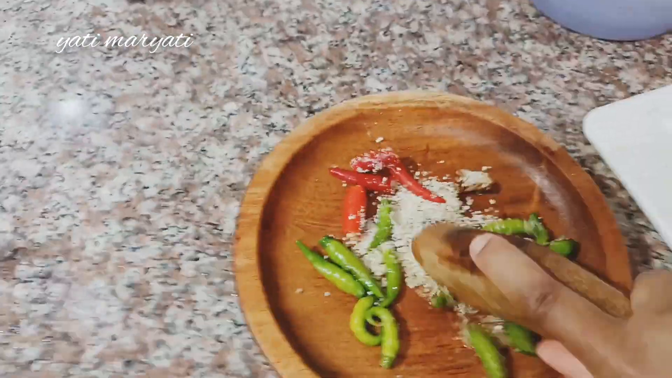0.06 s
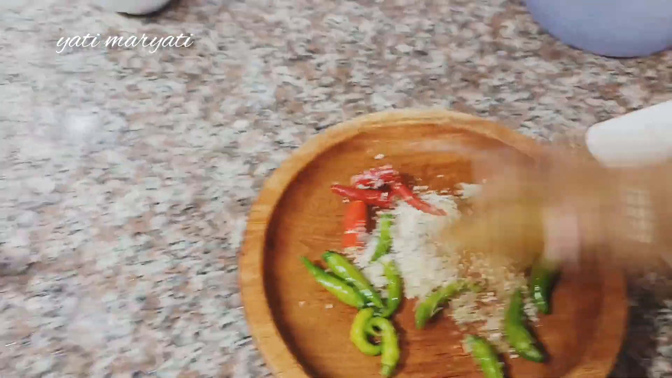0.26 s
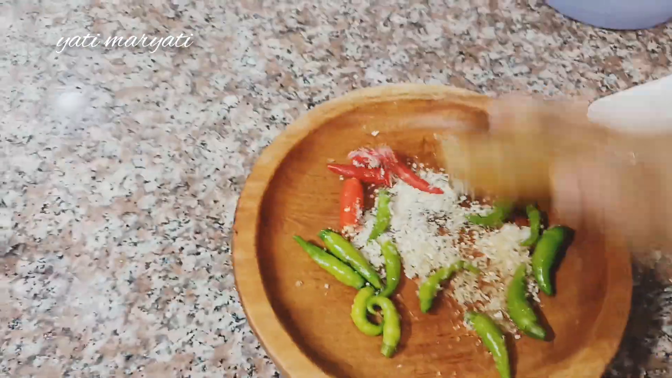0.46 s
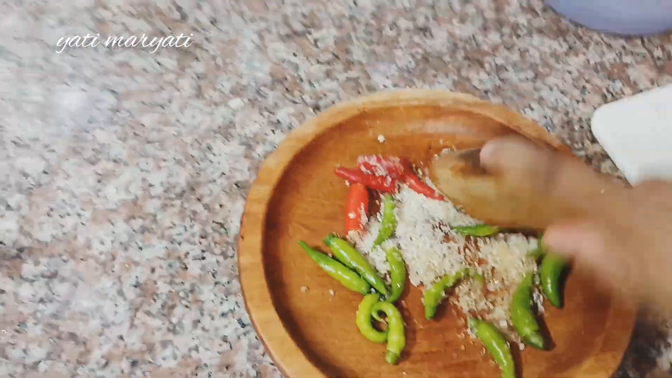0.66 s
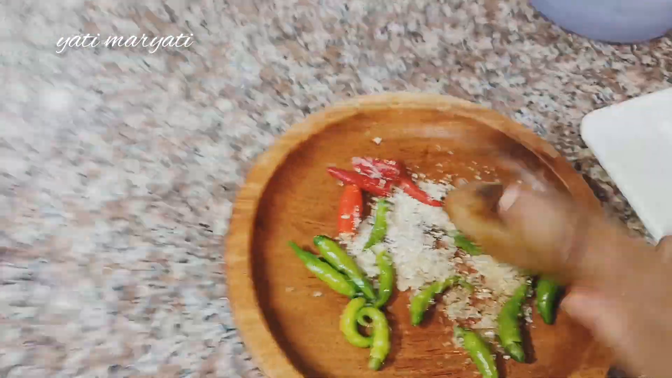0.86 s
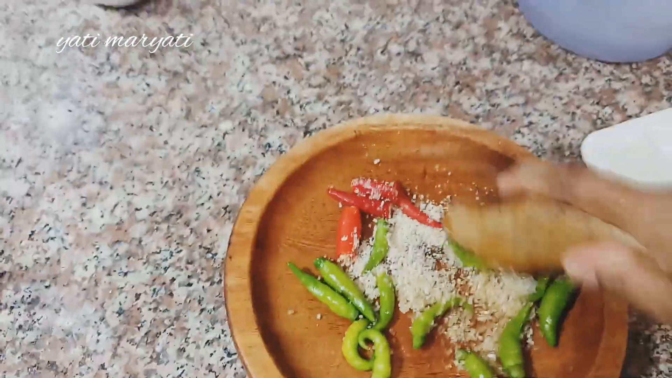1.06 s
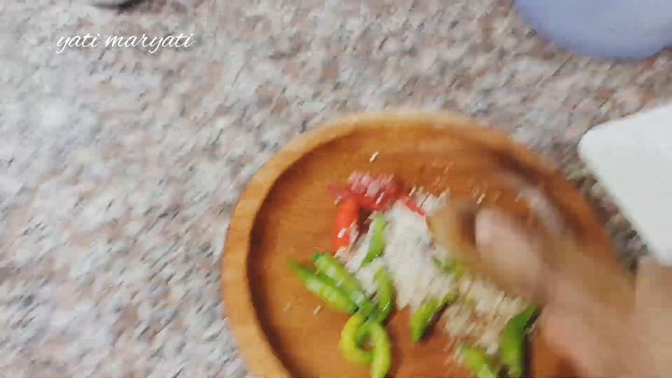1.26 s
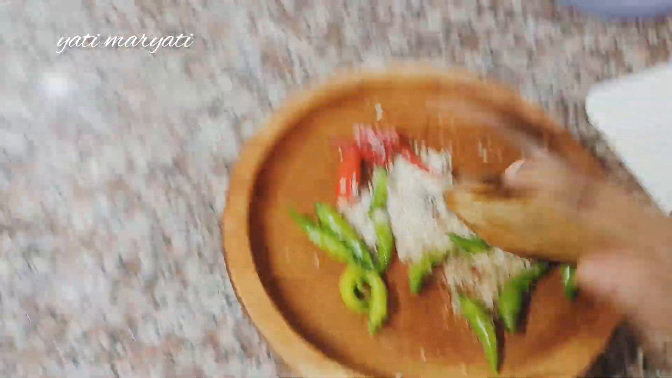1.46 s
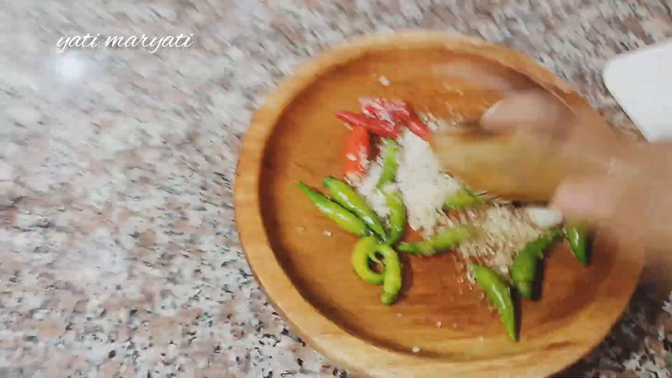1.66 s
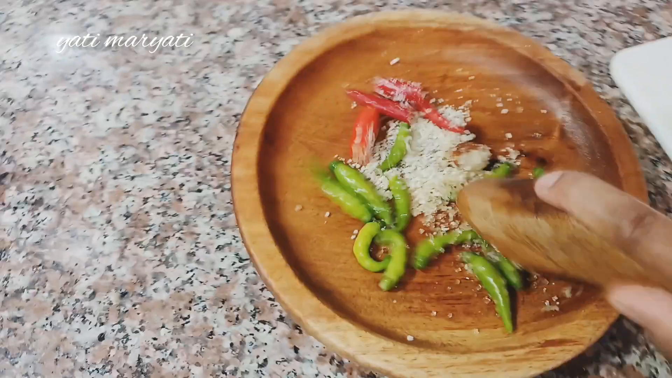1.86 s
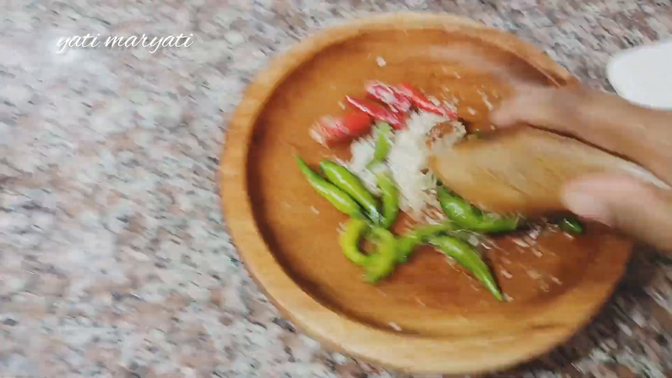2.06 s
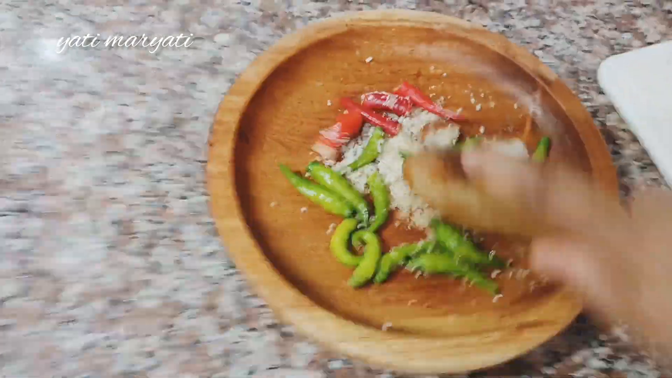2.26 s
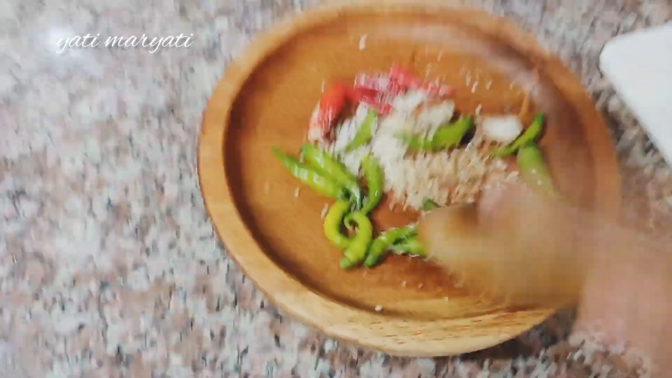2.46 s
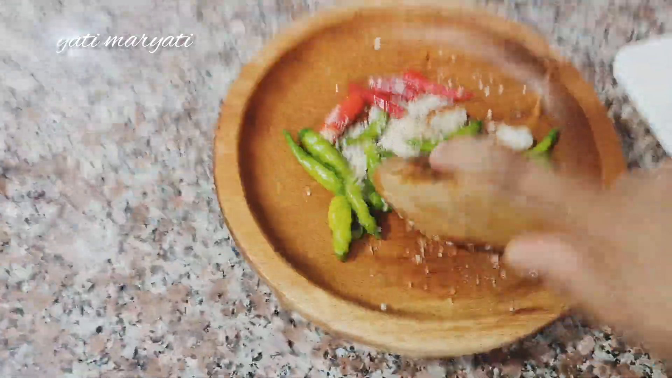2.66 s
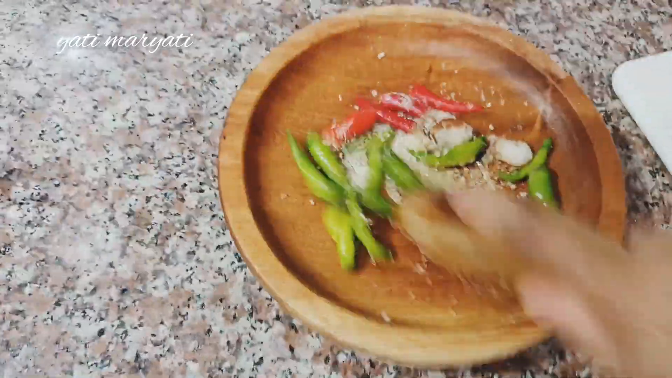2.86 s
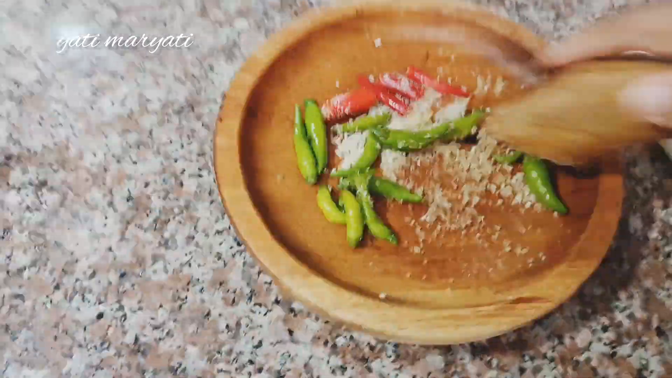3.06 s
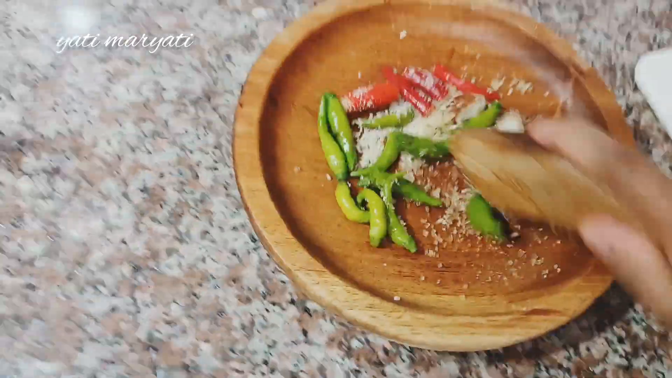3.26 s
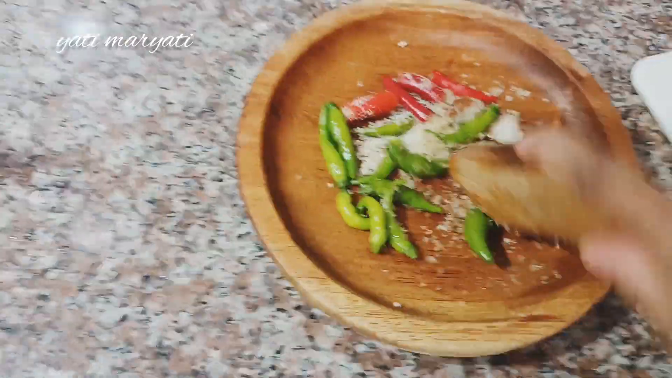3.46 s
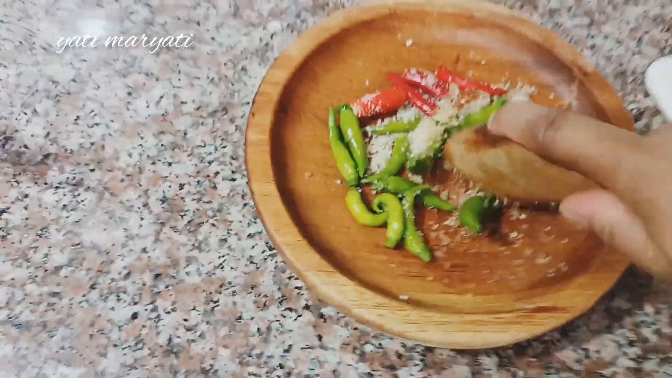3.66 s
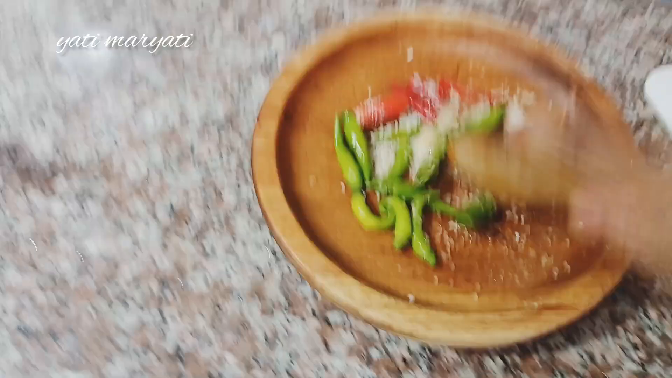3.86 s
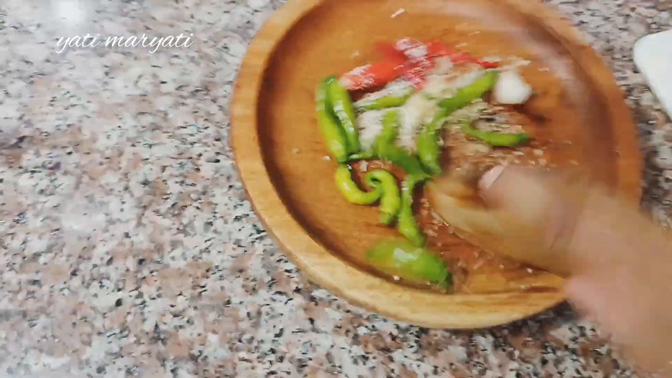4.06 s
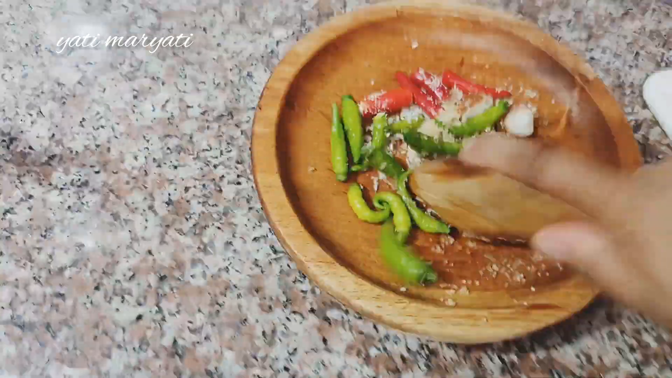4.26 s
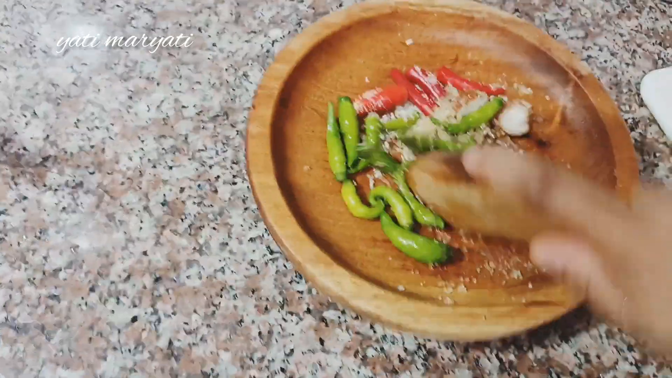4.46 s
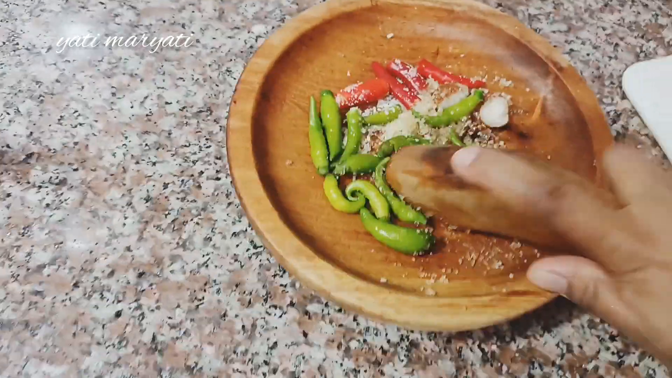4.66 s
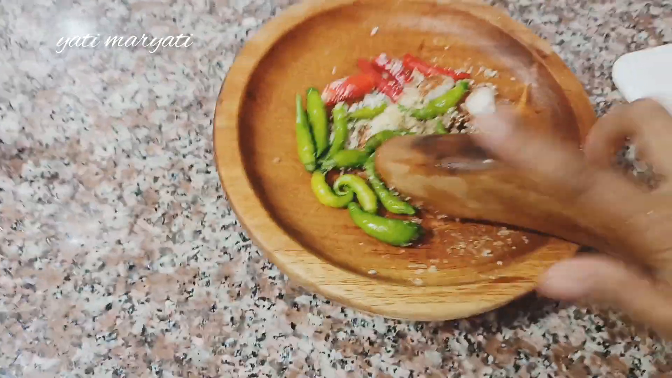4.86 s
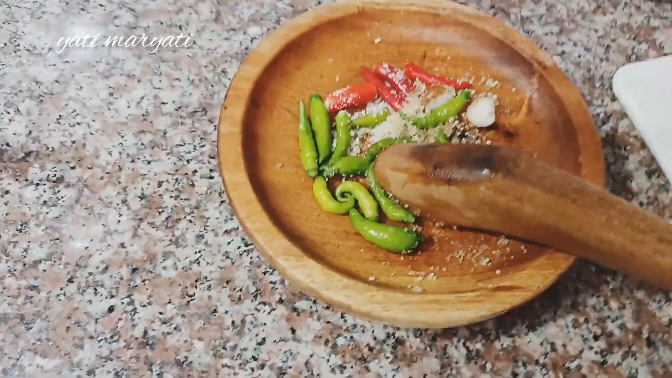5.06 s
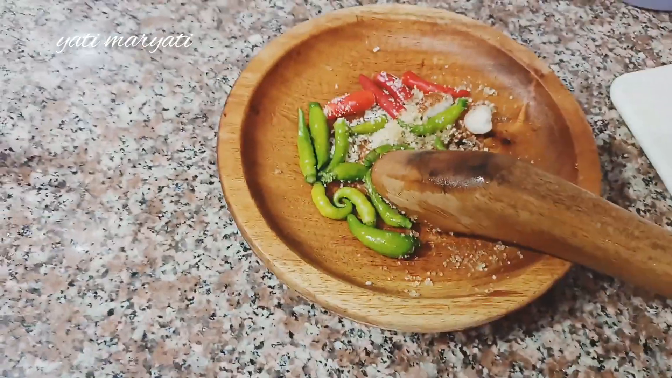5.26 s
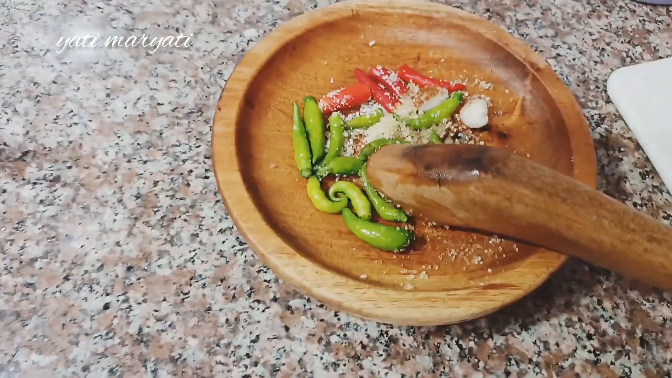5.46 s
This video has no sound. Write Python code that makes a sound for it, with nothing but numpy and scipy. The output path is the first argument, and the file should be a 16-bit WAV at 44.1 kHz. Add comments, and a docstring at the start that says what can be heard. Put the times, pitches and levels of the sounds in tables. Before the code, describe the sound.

Close stereo sound of a wooden pestle crushing grains, garlic and chillies on a wooden plate, in a small kitchen with short, bright echoes. From 0 to 0.3 s a press crackles with several snaps. After a brief gap, a light wood knock and dull thump at about 0.5 s lead into softer gritty sweeps, brighter near 1.0 s, with sharp cracks around 1.3 s and a strong crunch at 1.6 s. From 1.9 to 2.4 s strokes come faster, with low rumbling drags. Around 2.6 s wood knocks and a hollow growl join in, then a dense run of cracks to 3.0 s. Heavy, ringing presses follow from 3.2 s, with loud snaps and a thump near 3.6 s and another knock at 4.2 s. Crunching thins out by 4.75 s. A faint, soft tap at 5.0 s leaves only quiet low hum and airy room noise until about 5.5 s.

```python
"""Crunching and cracking of grains, garlic and chillies, crushed by a wooden pestle on a wooden plate.
Each stroke is a shower of tiny random clicks: sweeps mostly crunch, while presses make the plate ring.
Noise bursts make the loud cracks; heavy drags shake the plate into a low rumble and a hollow growl.
Fading sine waves make the knocks of wood on wood and the dull thumps of the plate on a stone counter.
Behind it lie a faint hum and soft air, both filtered noise; random echoes make the small kitchen."""
import sys
import numpy as np
from scipy import signal
from scipy.fft import rfft, irfft
from scipy.io import wavfile
from scipy.ndimage import uniform_filter1d

SR = 44100
rng = np.random.default_rng(int(sys.argv[2]) if len(sys.argv) > 2 else 0)


def store_pcm(level_fs):
    """Save levels as 16-bit WAV."""
    pcm = np.round(np.clip(level_fs, -1, 1) * 32767).astype(np.int16)
    wavfile.write(sys.argv[1], SR, np.atleast_2d(pcm).T)


N = 242632
TIME = np.arange(N) / SR

# Colour of the room air. Each row: frequency in Hz, relative level in dB.
AIR_COLOUR = [(20, -9.5), (60, 0.5), (125, -15), (260, -10), (350, -6), (480, -12), (750, -8),
              (1400, -12.5), (2800, -16), (5600, -23.5), (10000, -30), (16000, -37)]
AIR_DB = -47.5
# A faint appliance hum. Each row: frequency in Hz, level in dB.
HUM_TONES = [(123, -55.5), (180, -58)]
# How long the kitchen echoes. Each row: frequency in Hz, time to fade by 60 dB in seconds.
KITCHEN_FADE = [(150, 0.044), (2000, 0.31), (6000, 0.34), (16000, 0.3)]
# The resonance of each microphone's opening, left then right.
# Each row: frequency in Hz, width in Hz, lift in dB.
MICROPHONE_PORTS = [(10060, 1240, 14.5), (10760, 1990, 17)]
LEFT_LAG_MS = 0.93
EDGE_HZ = 15850  # almost nothing sounds above this frequency

# The plate rocks on the counter. Each row: start in seconds, relative level in dB, starting pitch in Hz.
PLATE_THUMPS = [(0.46, -43, 106.4), (0.522, -33, 85.5), (0.716, -31.5, 65.5), (0.833, -36, 180),
                (1.151, -40, 172), (1.888, -29, 93), (2.568, -31.5, 98), (3.627, -23.5, 171),
                (4.123, -30.5, 102)]
# The pestle meets bare wood. Each row: start in seconds, relative level in dB, contact time in
# milliseconds, length of the onset in seconds, pitch of the modes as a ratio.
WOOD_KNOCKS = [(0.4597, -25.5, 0.84, 0.00043, 0.97), (0.516, -35, 0.8, 0.003, 1.06),
               (2.588, -30, 0.4, 0.0039, 0.99), (2.606, -28, .35, 0.002, 0.96),
               (4.172, -26, 0.98, 0.0022, 0.77), (5.004, -32, 0.46, 0.0045, 1.06)]
# The pestle and plate ringing free after a knock.
# Each row: frequency in Hz, relative level in dB, time to fade by 60 dB in seconds.
WOOD_MODES = [(610, 6, 0.023), (739, 11, 0.041), (809, 1.5, 0.11), (1035, -8, 0.057), (1847, 4.5, 0.04),
              (2440, 6.5, 0.015)]
# The arm's weight makes the pestle judder across the plate.
# Each row: start in seconds, length in seconds, relative rumble level in dB, relative growl level in dB.
HEAVY_DRAGS = [(1.894, 0.11, -40, -45.5), (2.202, 0.13, -43.5, -48), (2.588, 0.078, -44, -33),
               (2.826, 0.14, -43, -35.5), (3.222, 0.14, -45, -49), (4.138, 0.11, -40, -38)]
# The plate's deep rumble on the counter and its hollow growl: frequency in Hz, width in Hz.
RUMBLE, GROWL = (127, 200), (574, 160)

# The pestle skims through loose grains, a bright crunch.
# Each row: start in seconds, length in seconds, relative level in dB.
GRAIN_SWEEPS = [(0.484, 0.078, -39), (0.565, 0.16, -32), (0.805, 0.091, -33), (0.918, 0.087, -30),
                (0.997, 0.044, -21), (1.125, 0.1, -33), (1.231, 0.16, -28), (1.434, 0.1, -35),
                (1.551, 0.15, -21), (1.877, 0.049, -25), (1.928, 0.046, -23), (1.965, 0.092, -20.5),
                (2.127, 0.089, -23), (2.419, 0.022, -27.5), (2.534, 0.044, -29), (2.6, 0.14, -23),
                (2.756, 0.064, -27), (3.308, 0.044, -14.5), (3.377, 0.062, -34.5), (3.471, 0.18, -31.5),
                (3.974, 0.046, -32.5), (4.126, 0.084, -21.5)]
# The pestle bears down and the plate rings. Each row: start in seconds, length in seconds,
# relative force in dB, extra force on the low modes in dB.
PLATE_PRESSES = [(0, 0.02, -26, -5), (0.022, 0.28, -35.5, -2.5), (0.117, 0.091, -23.5, 1.5),
                 (0.228, 0.045, -35, -12), (0.699, 0.024, -30, -10), (1.605, 0.081, -28.5, 3.5),
                 (1.978, 0.095, -30.5, 3.5), (2.22, 0.11, -36.5, 7), (2.28, 0.084, -22.5, 1.5),
                 (2.351, 0.032, -29.5, -10), (2.569, 0.051, -33, 10), (2.843, 0.064, -31.5, 12),
                 (2.916, 0.059, -20.5, -0.5), (3.179, 0.063, -35.5, 8), (3.214, 0.093, -24, 7.5),
                 (3.313, 0.037, -26, 9.5), (3.623, 0.076, -24.5, 0.5), (3.803, 0.082, -24.5, -1.5),
                 (3.873, 0.094, -29.5, -2), (4.085, 0.035, -34.5, -8), (4.136, 0.068, -32.5, 10.5),
                 (4.211, 0.11, -27, -1), (4.35, 0.075, -22, -14), (4.43, 0.15, -28.5, 0),
                 (4.662, 0.045, -40, 6.5)]
# Share of a sweep that reaches the plate's high and low modes, and the crunch that goes with a press.
SWEEP_HIGH_DB, SWEEP_LOW_DB, PRESS_CRUNCH_DB = -12, -11.5, 0.5
# Every stroke takes hold, swells to the middle of its path while the hand slackens, and lets go.
ATTACK_S, SWELL_DB, SAG_DB_PER_S, RELEASE_S = 0.0074, 3.5, 7, 0.026

# A large grain bursts. Each row: start in seconds, relative level in dB.
GRAIN_CRACKS = [(0.136, -15), (0.147, -11.5), (0.185, -13.5), (0.2527, -16), (.299, -14.5), (.562, -25.5),
                (.596, -30), (1.2602, -14.5), (1.281, -18.5), (1.3103, -10.5), (1.359, -18.5), (1.596, -18),
                (1.67, -25), (1.8833, -13.5), (1.9293, -14), (1.974, -15.5), (2.005, -17), (2.134, -13.5),
                (2.164, -17.5), (2.204, -21), (2.2298, -11.5), (2.38, -19), (2.5385, -18.5), (2.6085, -9),
                (2.6586, -18), (2.763, -18), (2.797, -16), (2.823, -11.5), (2.8542, -10.5), (2.860, -13.5),
                (2.8844, -14), (2.923, -11), (2.9339, -17.5), (2.96, -13.5), (2.9861, -12.5), (3.195, -22),
                (3.264, -16), (3.317, -9), (3.36, -18.5), (3.4822, -18), (3.605, -19), (3.6262, -7),
                (3.6336, -7.5), (3.6938, -8.5), (3.8192, -8), (3.832, -15), (3.883, -11.5), (4.1139, -12.5),
                (4.132, -14), (4.1717, -8), (4.2147, -13.5), (4.235, -16), (4.3562, -12.5), (4.451, -10.5),
                (4.508, -14.5), (4.5163, -9), (4.56, -11), (4.729, -12.5)]
# A crack's push on the plate when a press pins the grain or has just done so, and when it lies loose.
PINNED_DB, LOOSE_DB = 1.5, -6.5
PINNED_FOR_S = 0.05  # a grain still counts as pinned this long after a press

# Colour of a breaking grain. Each row: frequency in Hz, relative level in dB.
GRAIN_COLOUR = [(100, -43), (1000, 1.5), (1400, -13.5), (2400, -4.5), (3500, 4), (5500, 7), (8000, 2.5),
                (10000, 1.5), (12500, -4.5), (16000, -5)]
# The plate bending as a whole under the pestle. Each row: frequency in Hz, width in Hz, relative level in dB.
LOW_PLATE_MODES = [(127, 22.5, 5), (362, 77, -3), (553, 145, 0.5), (855, 71, 11), (1053, 275, 4.5)]
# The brighter resonances of plate and pestle. Each row: frequency in Hz, width in Hz, relative level in dB.
HIGH_PLATE_MODES = [(1758, 94, 8), (1945, 183, 8.5), (2590, 560, -3), (2858, 79, 0.5), (3077, 350, 0),
                    (3580, 410, -2.5), (4216, 225, -3.5), (5100, 2960, -6)]
# Grip and contact shift the lowest bright resonances and free or damp the upper ring.
# Each row: time in seconds, mean shift in Hz, change of the upper ring in dB.
GRIP_CHANGES = [(0.198, 40, 3), (1.599, -100, -2.5), (2.028, -81.5, 2.5), (2.23, 20.5, 0.5),
                (2.33, -50.5, -1), (2.62, -130, 4), (2.951, 20, 4.5), (3.3, -18.5, -2.5), (4.15, -29.5, 5),
                (4.5, 9, 5.5)]


def amp(db):
    """Turns decibels into a gain."""
    return 10 ** (np.asarray(db) / 20)


def evened(x):
    """Scales a sound to an average (rms) strength of 1."""
    return x / np.sqrt(np.mean(x ** 2) + 1e-20)


def read(points, hz):
    """Reads a table between its rows, on a log-frequency axis."""
    f, value = np.transpose(points)
    return np.interp(np.log(hz + 1), np.log(f + 1), value)


def add(mix, s, sound):
    """Mixes a sound in at time s."""
    part = mix[max(round(s * SR), 0):][:len(sound)]
    part += sound[:len(part)]


def causal(gain_at, size=4096):
    """Makes a filter with the given gain over frequency that responds as early as it can."""
    log_gain = np.log(gain_at(abs(np.fft.fftfreq(size, 1 / SR))) + 1e-5)
    return np.fft.ifft(np.exp(np.conj(signal.hilbert(log_gain)))).real[:size // 2]


def ring(x, response):
    """Lets a force set off a response, scaled to unit energy."""
    return signal.oaconvolve(x, response / np.linalg.norm(response))[:N]


def bell(hz, centre_hz, width_hz):
    """Gives the bell-shaped power of one resonance, 1 at its centre."""
    return 1 / (1 + (2 * (hz - centre_hz) / width_hz) ** 2)


def air(hum_width_hz=19, right_db=-4.5):
    """Soft room noise, unrelated at the two microphones, and a loosely wavering hum of narrow noise."""
    hz = np.fft.rfftfreq(N, 1 / SR)
    noise_spectrum = rfft(rng.standard_normal((2, N)))
    noise = evened(irfft(noise_spectrum * amp(read(AIR_COLOUR, hz)), N))
    hum = np.zeros(N)
    for f, db in HUM_TONES:
        hum_spectrum = rfft(rng.standard_normal(N)) * bell(hz, f, hum_width_hz)
        hum += amp(db) * evened(irfft(hum_spectrum, N))
    return (amp(AIR_DB) * noise + hum) * amp([[0], [right_db]])


def reflections(start_s, t60_at, count=22000):
    """Sparse random echoes for left and right, each band of pitch fading at its own speed."""
    kept = rng.random((2, count)) < 0.25
    late_enough = np.arange(count) / SR > start_s
    taps = rng.standard_normal((2, count)) * kept * late_enough
    hz, t, bands = signal.stft(taps, SR, nperseg=128)
    fading = amp(-60 * t / t60_at(hz)[:, None])
    tail = signal.istft(bands * fading, SR, nperseg=128)[1]
    return tail / np.linalg.norm(tail, axis=1, keepdims=True)


def kitchen(x, near_db=2.0, near_t60=0.022, room_db=-5.5, right_db=-5.5, scatter_hz=2400, shadow=0.3,
            places_per_s=30, count=17):
    """Sound reaches the right microphone first; hand and rim scatter the treble, then the room rings."""
    treble = signal.butter(1, scatter_hz, "high", fs=SR)
    direct = x - shadow * signal.lfilter(*treble, x)
    left = np.interp(TIME - LEFT_LAG_MS / 1000, TIME, direct)
    out = np.array([left, direct])
    # each place of the travelling pestle has its own echoes, faded in and out; the places come round again
    travel = TIME * places_per_s
    for place in range(count):
        fade = np.sin(np.pi / 2 * np.minimum((travel - place) % count, 2))
        part = x * fade
        near = signal.lfilter(*treble, reflections(0.0001, lambda hz: near_t60 + 0 * hz))
        far = reflections(0.0015, lambda hz: read(KITCHEN_FADE, hz))
        echoes = amp(near_db) * near + amp(room_db) * far
        out += signal.fftconvolve(part[None], echoes, axes=1)[:, :N]
    return out * amp([[0], [right_db]])


def ports(pair, right_bass_loss=0.16, bass_hz=700):
    """Each microphone's opening lifts a narrow part of the treble; the right one hears a little less bass."""
    left, right = pair
    right_bass = signal.lfilter(*signal.butter(1, bass_hz, fs=SR), right)
    pair = np.array([left, right - right_bass_loss * right_bass])
    colours = []
    for f, width, db in MICROPHONE_PORTS:
        colours.append(causal(lambda hz: np.sqrt(1 + (amp(db) ** 2 - 1) * bell(hz, f, width))))
    return signal.oaconvolve(pair, np.array(colours), axes=1)[:, :N]


def thumps(swell_s=0.0059, sag=0.8):
    """A few dull low cycles whose pitch sags as the plate settles on the counter."""
    out, t = np.zeros(N), np.arange(SR // 8) / SR
    swell = t / swell_s * np.exp(1 - t / swell_s)
    for s, db, hz in PLATE_THUMPS:
        tone = np.sin(2 * np.pi * hz * t * (1 - sag * t))
        add(out, s, amp(db) * swell * tone)
    return out


def knocks(tick_db=-5, tick_s=0.0028):
    """Wood on wood: a dry tick and free modes; long contact dulls them, grains between soften the onset."""
    out, t = np.zeros(N), np.arange(SR // 6) / SR
    for s, level_db, contact_ms, onset_s, pitch_ratio in WOOD_KNOCKS:
        knock = np.zeros(len(t))
        for hz, db, t60 in WOOD_MODES:
            tone = amp(db - 60 * t / t60) * np.sin(2 * np.pi * hz * pitch_ratio * t)
            knock += tone / np.hypot(1, hz * contact_ms / 1000)
        dry_noise = evened(uniform_filter1d(rng.standard_normal(len(t)), size=8))
        knock += amp(tick_db) * np.exp(-t / tick_s) * dry_noise
        add(out, s, amp(level_db) * knock * np.minimum(t / onset_s, 1))
    return out


def stroke(length, db):
    """Power of one stroke of the hand: it takes hold, arches, slackens and lets go."""
    t = np.arange(round(length * SR)) / SR
    level_db = db - SWELL_DB * (2 * t / length - 1) ** 2 - SAG_DB_PER_S * (t - length / 2)
    take_hold = np.minimum(t / ATTACK_S, 1)
    let_go = np.minimum((length - t) / RELEASE_S, 1)
    return take_hold * let_go * amp(level_db) ** 2


def fractures(per_s=1800, spread_db=4.5, clump_db=2.5, clump_s=0.003, powder=0.11):
    """Tiny clicks of very unequal size, clumped as the pestle sticks and slips, over the rub of powder."""
    size = amp(spread_db * np.minimum(rng.exponential(1, N), 4)) * rng.choice([-1, 1], N)
    clicks = size * (rng.random(N) < per_s / SR)
    slips = np.interp(TIME / clump_s, np.arange(N), np.clip(rng.standard_normal(N), -2, 2))
    force = (evened(clicks) + powder * rng.standard_normal(N)) * amp(clump_db * slips)
    # the hand keeps the mean effort steady
    return force / np.sqrt(uniform_filter1d(force ** 2, size=1300) + 1e-9)


def drags():
    """Uneven slips under heavy pressure shake the whole plate into a rumble and a growl."""
    rumble, growl = np.zeros((2, N))
    for s, length, rumble_db, growl_db in HEAVY_DRAGS:
        add(rumble, s, stroke(length, rumble_db))
        add(growl, s, stroke(length, growl_db))
    slips = fractures()
    out = np.zeros(N)
    for power, mode in ((rumble, RUMBLE), (growl, GROWL)):
        out += ring(np.sqrt(power) * slips, causal(lambda hz: bell(hz, *mode)))
    return out


def chips(per_s=45, chip_db=7.5, chip_s=0.00069):
    """Now and then a middling grain gives way: a brief jump in the force."""
    t = np.arange(SR // 100) / SR
    jumps = np.minimum(rng.exponential(1, N), 2) * (rng.random(N) < per_s / SR)
    return evened(1 + amp(chip_db) * signal.oaconvolve(jumps, np.exp(-t / chip_s))[:N])


def grinding(crunch_db=-9.5, pressure_db=-2.5, low_db=-11.5, pinned_chips=0.5):
    """Forces on grains, high modes and low modes: sweeps mostly crunch, presses drive more evenly."""
    swept, pressed = np.zeros((2, 3, N))
    for s, length, db in GRAIN_SWEEPS:
        for path, share_db in zip(swept, (0, SWEEP_HIGH_DB, SWEEP_LOW_DB)):
            add(path, s, stroke(length, db + share_db))
    for s, length, db, extra_db in PLATE_PRESSES:
        for path, share_db in zip(pressed, (PRESS_CRUNCH_DB, 0, extra_db)):
            add(path, s, stroke(length, db + share_db))
    chipping = chips()
    milder_chipping = evened(chipping ** pinned_chips)
    power = swept * chipping ** 2 + pressed * milder_chipping ** 2
    return amp([[crunch_db], [pressure_db], [low_db]]) * np.sqrt(power) * fractures()


def cracks(paths, crack_db=11.5, low_db=-11.5, burst_s=0.00042, crumble=0.23, crumble_s=0.014):
    """A large grain bursts sharply, then its pieces crumble; the plate takes more of the blow under a press."""
    out, t = np.zeros(N), np.arange(SR // 25) / SR
    shape = t / burst_s * np.exp(1 - t / burst_s) + crumble * np.exp(-t / crumble_s)
    for s, db in GRAIN_CRACKS:
        pinned = any(start <= s <= start + length + PINNED_FOR_S for start, length, *_ in PLATE_PRESSES)
        push_db = PINNED_DB if pinned else LOOSE_DB
        burst = shape * rng.standard_normal(len(t))
        for path, share_db in zip(paths, (0, push_db, push_db + low_db)):
            sound = signal.fftconvolve(burst, path)
            add(out, s, amp(db + crack_db + share_db) * sound / np.linalg.norm(sound))
    return out


def resonances(modes, steep):
    """Response of a set of modes; steep deepens the valleys between them."""
    def gain(hz):
        return np.sqrt(sum(amp(db) ** 2 * bell(hz, f, width) ** steep for f, width, db in modes))
    return causal(gain)


def mortar():
    """Grains sound by three paths: directly, through the plate's high modes and through its low modes."""
    direct = causal(lambda hz: amp(read(GRAIN_COLOUR, hz)))
    paths = direct, resonances(HIGH_PLATE_MODES, steep=1.8), resonances(LOW_PLATE_MODES, steep=1.223)
    ground = sum(ring(force, path) for force, path in zip(grinding(), paths))
    return ground + cracks(paths)


def gripped(x, wander_hz=32, trade=0.083):
    """The lowest bright resonances slide as the contact rolls, and weaken when grip frees the upper ring."""
    hz = np.fft.fftfreq(N, 1 / SR)
    spectrum = 2 * np.fft.fft(x)
    # complex bands, from positive frequencies only, so that their pitch can be shifted
    lower = np.fft.ifft(spectrum * ((hz > 1500) & (hz < 2300)))
    upper = np.fft.ifft(spectrum * ((hz > 2650) & (hz < 3400)))
    times, shift_hz, ring_db = np.transpose(GRIP_CHANGES)
    wander = evened(uniform_filter1d(rng.standard_normal(N), size=1500))
    shift_hz = np.interp(TIME, times, shift_hz) + wander_hz * wander
    ring_db = np.interp(TIME, times, ring_db)
    turn = np.exp(2j * np.pi * np.cumsum(shift_hz) / SR)
    lower_change = lower * (turn * amp(-trade * ring_db) - 1)
    upper_change = upper * (amp(ring_db) - 1)
    return x + (lower_change + upper_change).real


def scene():
    """Grinding, heavy drags, knocks and thumps in the humming kitchen."""
    at_the_plate = gripped(mortar()) + drags() + knocks() + thumps()
    return ports(kitchen(at_the_plate) + air())


def record(dry):
    """Clips at full scale, then removes nearly everything above the edge frequency."""
    edge = signal.firwin(401, EDGE_HZ, window=("kaiser", 8), fs=SR)
    return signal.oaconvolve(np.clip(dry, -1, 1), edge[None], "same", axes=1)


dry = scene()
out = record(dry)
store_pcm(out)
```